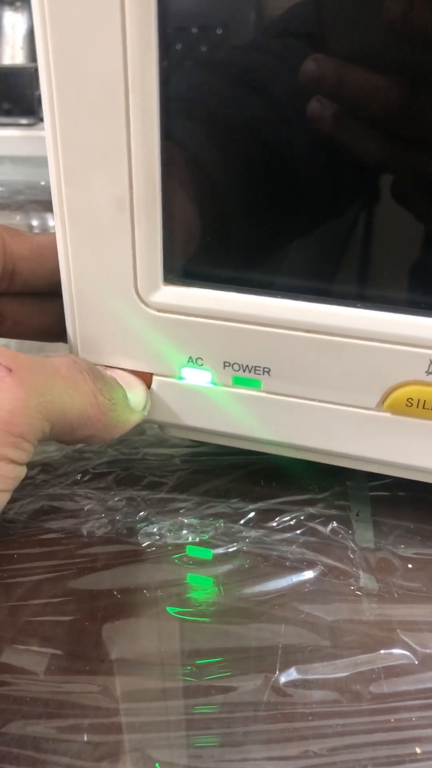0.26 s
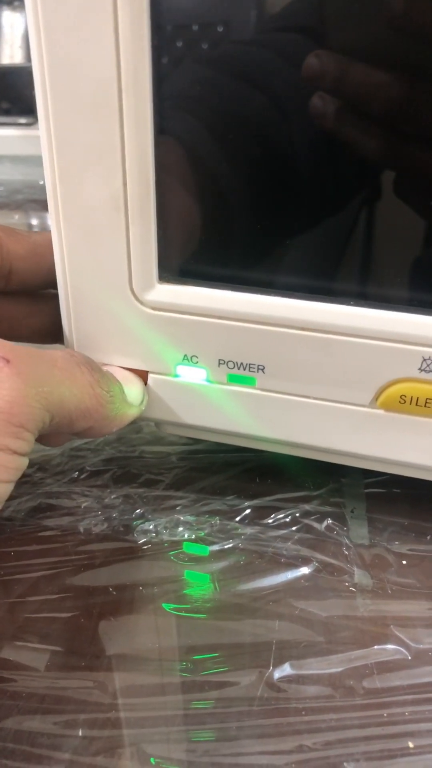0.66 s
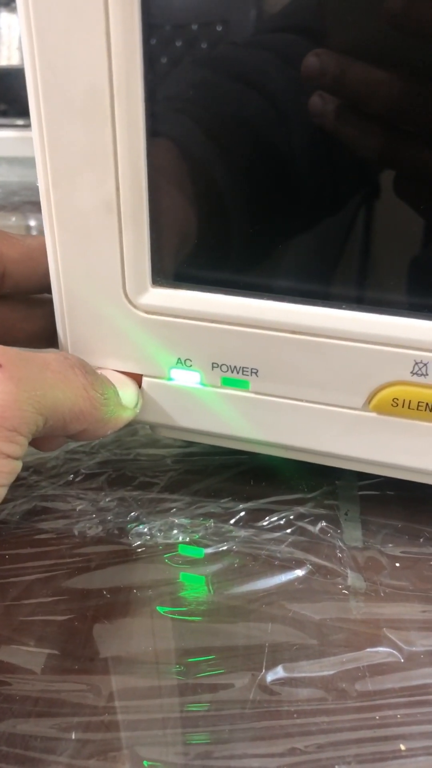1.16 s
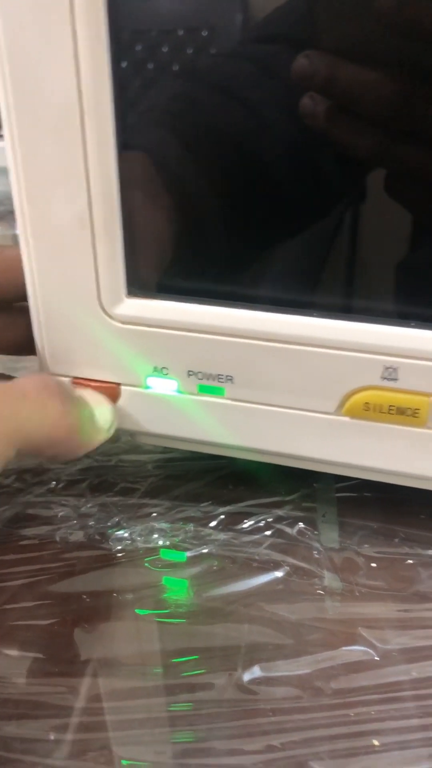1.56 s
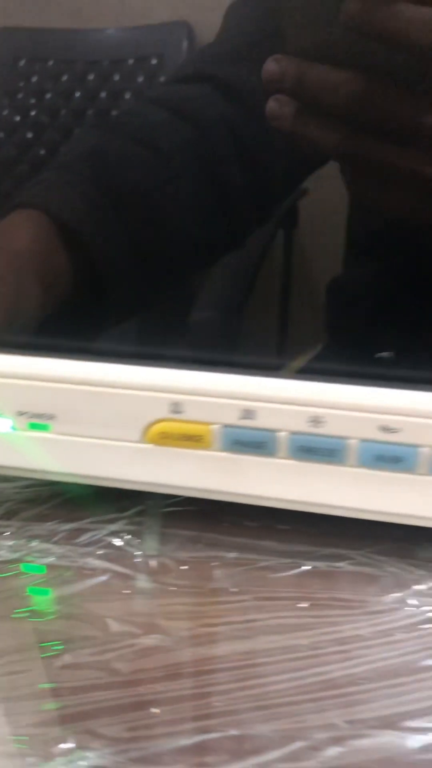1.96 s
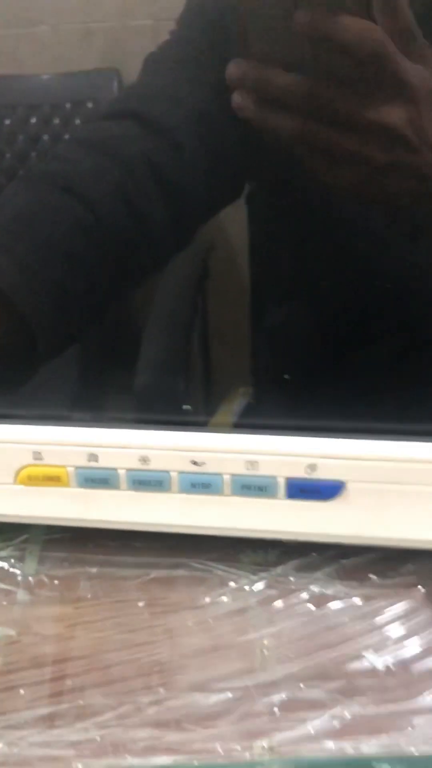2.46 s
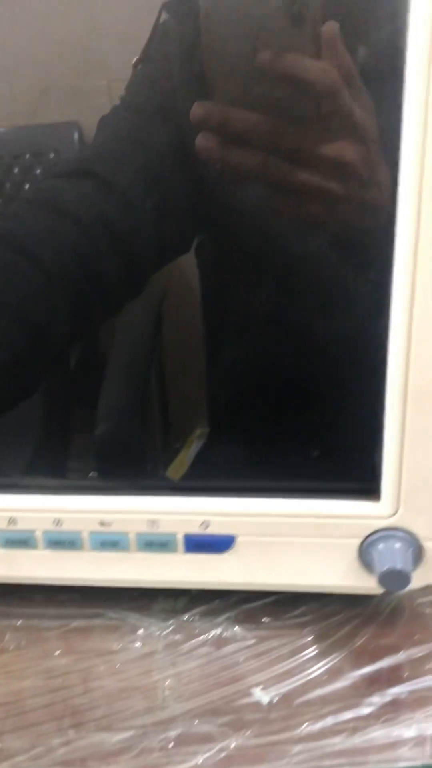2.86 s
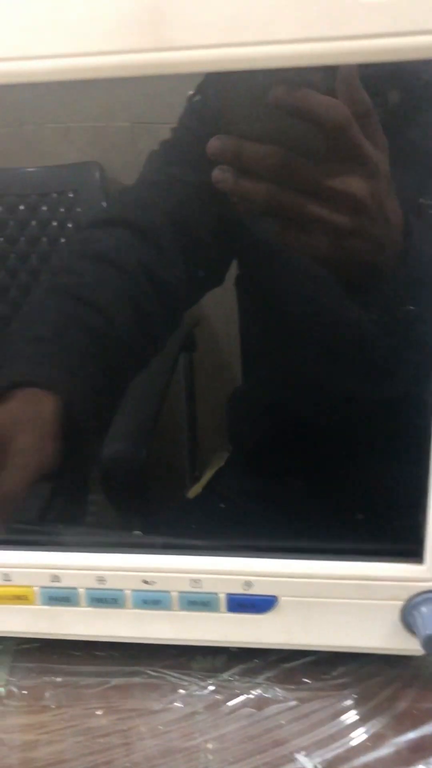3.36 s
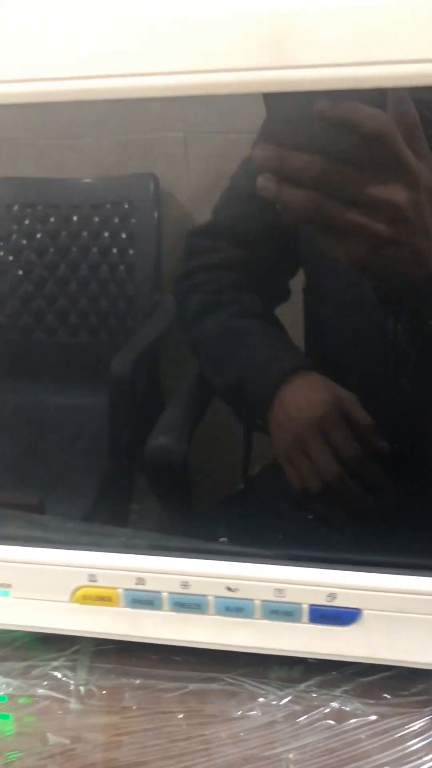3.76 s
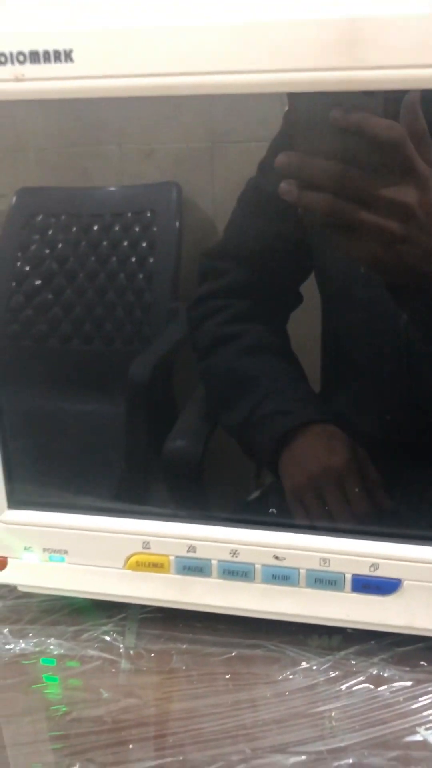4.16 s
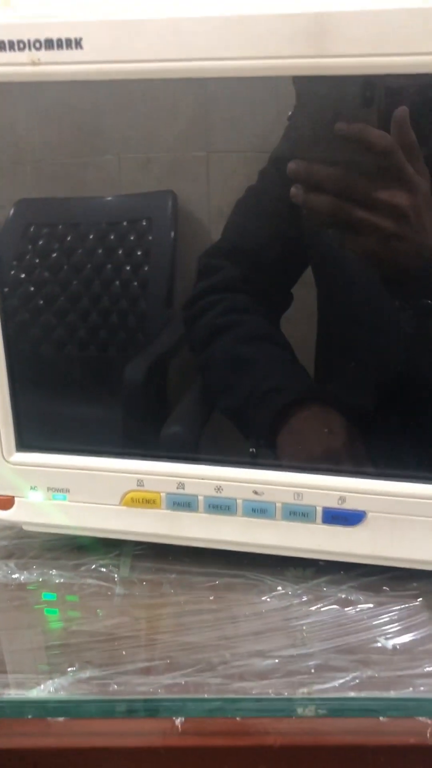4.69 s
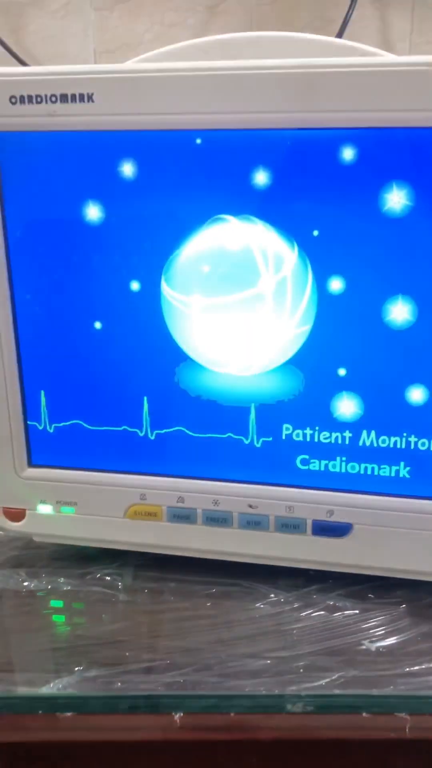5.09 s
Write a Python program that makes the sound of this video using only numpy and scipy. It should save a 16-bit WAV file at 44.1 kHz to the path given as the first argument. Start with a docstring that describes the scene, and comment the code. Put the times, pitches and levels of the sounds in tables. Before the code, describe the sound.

Faint room rumble and mains hum run throughout in a small workshop. At about 0.2 to 0.5 seconds a thumb presses a monitor's power button, making a few short, dry plastic clicks. A sharper cluster with a tiny spring ping comes at 1.6, followed by faint sleeve rustle. The hollow case is softly bumped around 2.1, then scrapes briefly on the table with light taps near 2.5. A relay snaps crisply at 2.7. At 3.7 a sharp knock sets the metal chassis clanking, and the table shudders twice. The sleeve swishes with thin, very high squeaks until about 4.5. More soft bumps land around 4.6. From 4.8 the electronics give a faint hiss and high whine over a low, dull rush. The relay snaps again at about 5.15, and the hiss and whine die away.

```python
"""Over faint room rumble and mains hum, a thumb clicks the power button of a monitor on a workshop table;
each contact excites the modes of the plastic housing. A sleeve rustles by friction, the case is bumped
and slides, and a relay snaps. A later sharp knock sets the metal chassis clanking; the table shudders and
the sleeve swishes and squeaks as the arm draws back. After more soft bumps the electronics hiss and
whine over a low, dull rush, dying away once the relay has snapped a second time."""
import sys
import numpy as np
from scipy import signal
from scipy.fft import rfft, irfft, next_fast_len
from scipy.io import wavfile

SR = 44100
rng = np.random.default_rng(int(sys.argv[2]) if len(sys.argv) > 2 else 0)


def wrap_up_sound(samples):
    """Save the sound to the file named by the first command line argument, as 16-bit audio."""
    columns = np.atleast_2d(samples).T
    # keep every value between -1 and 1, then stretch to whole-number steps
    tamed = np.clip(columns, -1, 1)
    steps = np.round(tamed * 32767).astype(np.int16)
    wavfile.write(sys.argv[1], SR, steps)


N = 235097
TIME = np.arange(N) / SR
AGE = TIME[:SR // 2]   # time since a blow


def from_db(db):
    """Amplitude ratio: a factor of ten per 20 dB."""
    return 10 ** (np.asarray(db) / 20)


def at_hz(points, hz):
    """Interpolation on a logarithmic frequency axis."""
    f, value = np.transpose(points)
    return np.interp(np.log(np.maximum(hz, 1)), np.log(f), value)


def add(track, s, sound):
    """Superposition: a sound joins the track at time s."""
    start = round(s * SR)
    track[start:start + len(sound)] += sound[:N - start]


def blow(x, db):
    """Equivalent level: the energy of a blow, spread over 10 ms, is scaled to db."""
    return from_db(db) * x / np.sqrt(np.sum(x ** 2) / (SR / 100) + 1e-20)


def noise(spectrum, size, tilt=0):
    """Spectral shaping: noise of rms 1, tilted above 1 kHz by tilt dB per octave."""
    hz = np.maximum(np.fft.rfftfreq(size, 1 / SR), 1)
    bass_rolloff = 1 / np.sqrt(1 + (spectrum[0][0] / 2 / hz) ** 6)
    octaves = np.log2(np.maximum(hz / 1000, 1))
    colour = from_db(at_hz(spectrum, hz) + tilt * octaves)
    x = irfft(rfft(rng.standard_normal(size)) * bass_rolloff * colour, size)
    return x / np.std(x)


def flutter(rate):
    """Random modulation: rate values a second, joined linearly, with a spread near 1."""
    knots = rng.standard_normal(N // 16)
    return np.interp(TIME * rate, np.arange(len(knots)), knots)


def fade(t60):
    """Exponential damping: 60 dB in t60 seconds."""
    return np.exp(-np.log(1000) * AGE / t60)


def swell(seconds):
    """Finite rise time: the amplitude builds smoothly to 1."""
    return 1 - np.exp(-(AGE / seconds) ** 2)


def held(start_s, length_s, attack_s, release_s):
    """Sustained excitation: a smooth onset, then exponential decay after length_s."""
    age = np.maximum(TIME - start_s, 0)
    return (1 - np.exp(-(age / attack_s) ** 2)) * np.exp(-np.maximum(age - length_s, 0) / release_s)


def surge(peak_s, rise_s, fall_s):
    """Exponential growth and decay: a movement speeds up to one peak and slows at once."""
    return np.exp(-np.maximum((peak_s - TIME) / rise_s, (TIME - peak_s) / fall_s))


def ring(modes, cycles):
    """Modal superposition: damped sines of random strength build over some cycles, the lows last."""
    out = 0
    for k, (hz, db, t60) in enumerate(modes):
        strength = (-1) ** k * from_db(db + rng.standard_normal())
        out = out + strength * swell(cycles / hz) * fade(t60) * np.sin(2 * np.pi * hz * AGE)
    return out


def high_pass(x, hz):
    """Radiation efficiency: small bodies radiate little bass."""
    return signal.sosfilt(signal.butter(3, hz, "high", fs=SR, output="sos"), x)


# reverberation time: f/Hz, T60/s
ROOM_DECAY = [(100, 0.23), (300, 0.25), (800, 0.32), (3000, 0.41), (8000, 0.31), (16000, 0.24)]
# band gain of the reverberation: f/Hz, level/dB
ROOM_GAIN = [(100, 26.5), (200, 16), (300, 5.5), (550, 0.5), (1000, -1.5), (3000, 0.5), (8000, -6),
             (16000, -1)]
def room(x, wet_db, build_s):
    """Reverberation: diffuse reflections build up after the direct sound and die band by band."""
    hz = np.fft.rfftfreq(len(AGE), 1 / SR)
    white = rfft(rng.standard_normal(len(AGE)))
    edges = np.geomspace(50, 18000, 13)
    tail = 0
    for low, high in zip(edges, edges[1:]):
        centre = np.sqrt(low * high)
        decay = fade(at_hz(ROOM_DECAY, centre)) * swell(build_s)
        band = irfft(white * (hz >= low) * (hz < high), len(AGE))
        tail = tail + band * decay / np.linalg.norm(decay) * from_db(at_hz(ROOM_GAIN, centre))
    return x + from_db(wet_db) * signal.fftconvolve(x, tail)[:N]


# room rumble: f/Hz, relative spectrum level/dB
RUMBLE_SPECTRUM = [(15, -31), (25, -15), (48, -11), (84, -7), (114, -9.5), (212, -6), (236, -11.5),
                   (344, -9.5), (463, -13.5), (503, -12), (734, -19.5), (2350, -27.5), (9840, -32.5),
                   (16000, -39)]
# mains harmonics: f/Hz, rms level/dB
MAINS_TONES = [(60, -76), (120, -76)]
def background():
    """Stationary sound: the continuous spectrum of room rumble under the line spectrum of mains hum."""
    hum = sum(from_db(db) * np.sqrt(2) * np.sin(2 * np.pi * (hz * TIME + rng.random()))
              for hz, db in MAINS_TONES)
    return from_db(-67.5) * noise(RUMBLE_SPECTRUM, N) + hum


# circuit hiss: f/Hz, relative spectrum level/dB
HISS_SPECTRUM = [(600, -20), (1400, -8), (3800, -4), (4750, -1), (6000, -5.5), (8200, -10.5), (12500, -8),
                 (16000, -13)]
# power-supply whine: f/Hz, level/dB re the hiss
WHINE_TONES = [(4740, -12), (8050, -13), (9900, -15)]
def electronics():
    """Circuit noise and frequency-modulated whine: both rise at switch-on and fade after the last snap."""
    on_s, wander_hz = 4.78, 230
    whine = 0
    for hz, db in WHINE_TONES:
        pitch = hz + wander_hz * flutter(700)
        whine += from_db(db) * np.sqrt(2) * np.sin(2 * np.pi * np.cumsum(pitch) / SR)
    last_snap_s = RELAY_SNAPS[-1][0]
    waking = held(on_s, last_snap_s - on_s, attack_s=0.048, release_s=0.18)
    return from_db(-65) * waking * (noise(HISS_SPECTRUM, N) + whine)


# arm strokes; the last row is a low, dull rush while the electronics run:
# t/s, duration/s, level/dB, tilt/(dB/octave)
STROKES_AND_RUSH = [(-0.04, 0.075, -64, 1), (1.572, 1.71, -65.5, 0.47), (3.185, 0.5, -58, 0.1),
                    (3.66, 0.15, -49.5, 0), (3.835, 0.13, -54.5, 1), (4.002, 0.16, -55, 2.5),
                    (4.151, 0.53, -57.5, -2.5), (4.537, 0.058, -59, 2), (4.733, 0.48, -62, -4)]
# rubbing cloth, also tilted down for the rush: f/Hz, relative spectrum level/dB
RUSTLE_SPECTRUM = [(120, -5), (250, 1), (500, -1), (1000, -3), (2000, -10), (4000, -11), (7000, -18),
                   (11000, -21.5), (14000, -28), (16000, -39)]
# swishes where the arm is quickest: peak t/s, level/dB, decay time/s
ARM_SWISHES = [(3.38, -63, 0.071), (3.85, -57.5, 0.41), (4.11, -60.5, 0.32)]
# hissing weave: f/Hz, relative spectrum level/dB
WEAVE_SPECTRUM = [(2500, 0), (6000, -3), (10000, -4.5), (14000, -5), (16000, -8.5)]
# thin squeaks of the weave: t/s, duration/s, f/Hz
WEAVE_SQUEAKS = [(4.135, 0.07, 13500), (4.2, 0.11, 13800), (4.275, 0.079, 11800), (4.335, 0.05, 13850),
                 (4.39, 0.1, 11950), (4.435, 0.07, 13800)]
def sleeve_and_rush():
    """Friction noise: cloth rubs unevenly, hissing and squeaking at speed. A low, dull rush follows."""
    out = np.zeros(N)
    for start, length, db, tilt in STROKES_AND_RUSH:
        envelope = held(start, length, attack_s=0.05 + 0.1 * length, release_s=0.094)
        rustle = noise(RUSTLE_SPECTRUM, next_fast_len(N), tilt)[:N]
        out += envelope * from_db(db + flutter(60)) * rustle
    swishes = [from_db(db) * surge(s, rise_s=0.085, fall_s=fall) for s, db, fall in ARM_SWISHES]
    out += np.linalg.norm(swishes, axis=0) * noise(WEAVE_SPECTRUM, N)   # powers add
    for s, length, hz in WEAVE_SQUEAKS:
        size = int(length * SR)
        pitch = hz * (1 + 0.0073 * flutter(44) + 0.012 * flutter(700))[:size]   # drift and jitter
        add(out, s, from_db(-68) * np.hanning(size) * np.sin(2 * np.pi * np.cumsum(pitch) / SR))
    return out


# scraping feet: f/Hz, relative spectrum level/dB
SCRAPE_SPECTRUM = [(200, -11), (480, 7.5), (900, -2.5), (2000, -1.5), (3600, -2.5), (5500, -9.5),
                   (8000, -16), (16000, -21)]
def slide():
    """Stick-slip friction: the feet scrape in small slips as the case gathers speed and is braked."""
    speed = surge(peak_s=2.561, rise_s=0.072, fall_s=0.093)
    return noise(SCRAPE_SPECTRUM, N) * speed * from_db(-47 + 2 * flutter(380))


# shudders of the table: t/s, level/dB
TABLE_SHUDDERS = [(3.72, -49.5), (3.939, -53)]
# table vibration: f/Hz, relative spectrum level/dB
TABLE_SPECTRUM = [(55, -13), (90, -7.5), (120, 5), (165, -12), (250, -9), (400, -14), (800, -31),
                  (3000, -57)]
def shudder():
    """Forced vibration: the table shakes each time the case settles on it."""
    shaking = sum(from_db(db) * held(s, length_s=0.094, attack_s=0.017, release_s=0.062)
                  for s, db in TABLE_SHUDDERS)
    return shaking * noise(TABLE_SPECTRUM, N)


# soft bumps on the case: t/s, thump level/dB, scuff level/dB
CASE_BUMPS = [(2.0240, -41.5, -44), (2.084, -34.5, -47), (2.14, -49.5, -62), (4.5950, -48, -64),
              (4.6040, -55.5, -53), (4.641, -53, -62), (4.71, -80, -50.5)]
# hollow resonances: f/Hz, relative level/dB, T60/s
HOLLOW_MODES = [(216, -15.5, 0.039), (281.4, -29.5, 0.19), (432, -2.5, 0.063), (432, -29, 0.0083)]
# scuffing contact: f/Hz, relative spectrum level/dB
SCUFF_SPECTRUM = [(260, 6.5), (450, 10), (700, 2.5), (1000, 3.5), (1600, -7.5), (2700, -10), (5000, -26),
                  (16000, -32)]
def bumps():
    """Soft impact: a slow contact excites only the low hollow resonances, with a scuff on top."""
    out = np.zeros(N)
    for s, thump_db, scuff_db in CASE_BUMPS:
        add(out, s, blow(ring(HOLLOW_MODES, cycles=2.13), thump_db))
        scuff = noise(SCUFF_SPECTRUM, len(AGE)) * fade(0.27) * swell(0.00036)
        add(out, s, blow(scuff, scuff_db))
    return high_pass(room(out, wet_db=-9, build_s=0.015), 208)


# relay closures: t/s, snap level/dB, ring level/dB, snap tilt/(dB/octave)
RELAY_SNAPS = [(2.7296, -31.5, -37.5, -0.4), (5.1503, -32, -33.5, -0.2)]
# armature impact: f/Hz, relative spectrum level/dB
SNAP_SPECTRUM = [(500, -3), (1200, 5.5), (1500, -12), (1900, 4), (2700, -8), (3800, -0.5), (5400, 2.5),
                 (6300, 0.5), (7400, -9.5), (8600, 2), (10800, 6), (12300, 1.5), (13600, -3.5),
                 (16000, -13.5)]
# relay frame and board: f/Hz, relative level/dB, T60/s
RELAY_MODES = [(275, -14, .2), (715, -11, .08), (856, 0, .115), (1122, -9, .14), (1950, -16, .11),
               (3350, -17, .16), (4682, -12, .12), (5425, -9, .11), (5462, -9, .14), (5680, -12, .14),
               (5833, -9, .11), (9770, -14, .14), (10450, -12, .13), (10753, -12, .14), (11264, -10, .14),
               (11950, -12, .14), (12480, -13, .16), (13275, -16, .16)]
def relay():
    """Impact and rebound: the armature slams shut and chatters; the loose frame and board ring on."""
    rattle_db, rattle_hz = 7, 171
    snaps, rings = np.zeros(N), np.zeros(N)
    for s, snap_db, ring_db, tilt in RELAY_SNAPS:
        impact = (fade(0.044) + 0.18 * fade(0.1)) * swell(0.0015)   # hard blow, then dying rebounds
        chatter = impact * from_db(3.5 * flutter(1362)[:len(AGE)])
        rattle = from_db(rattle_db * flutter(rattle_hz)[:len(AGE)])
        snap = high_pass(noise(SNAP_SPECTRUM, len(AGE), tilt) * chatter, 240)
        add(snaps, s, blow(snap, snap_db))
        add(rings, s, blow(ring(RELAY_MODES, cycles=6.3) * rattle, ring_db))
    return room(snaps, wet_db=-4, build_s=0.014) + room(rings, wet_db=-10, build_s=0.013)


# clicks and taps: t/s, knock level/dB, knock centre f/Hz, tick level/dB, tick tilt/(dB/octave)
CONTACTS = [(0.2185, -52.5, 396, -53, -3), (0.2602, -50.5, 940, -71, 4), (0.2754, -37, 505, -51, -2),
            (0.4698, -43.5, 920, -53.5, 0.5), (0.7332, -73, 900, -64.5, -1.5), (1.4240, -56, 870, -72, 1),
            (1.532, -66, 800, -66, 1), (1.5632, -35, 940, -38.5, -0.5), (1.582, -52, 603, -53, 2.5),
            (1.5894, -44, 382, -48.5, 3.5), (1.6919, -57.5, 1200, -53.5, -0.5),
            (2.4166, -71, 1300, -58, -3), (2.443, -72, 480, -59, -8), (2.4810, -61, 1300, -56.5, -2),
            (2.502, -71, 500, -54, -2), (2.547, -41.5, 694, -58, 2), (3.6925, -49, 1710, -50, -1.5),
            (3.6980, -48, 1700, -47, -4), (3.7060, -40, 740, -38.5, -3), (3.7290, -44.5, 516, -47, -1),
            (3.926, -51, 333, -52.5, -0.5)]
# plastic housing: f/Hz, relative level/dB, T60/s
HOUSING_MODES = [(218.8, -21.5, 0.16), (271.6, -15.5, 0.16), (402, -9, 0.051), (470, -6, 0.035),
                 (626, -8.5, 0.049), (796, -8, 0.03), (1173, 5.5, 0.0045), (1486, -12, 0.0056),
                 (1580, -15, 0.054), (2210, -13.5, 0.0047), (3670, -28, .014)]
# dry tick: f/Hz, relative spectrum level/dB
TICK_SPECTRUM = [(700, 5.5), (1400, 4.5), (2000, 0), (2700, -4.5), (3400, -3), (4400, -5), (6200, -6),
                 (8500, -12), (13000, -17), (16000, -32)]
# button spring, loaded and released: t/s, f/Hz, level/dB, T60/s
SPRING_PINGS = [(0.22, 3310, -58, 0.01), (1.5870, 2230, -52, 0.087)]
# chassis clank at a later sharp knock: t/s, level/dB
CHASSIS_CLANKS = [(3.7060, -37.5)]
# metal chassis: f/Hz, relative level/dB, T60/s
CHASSIS_MODES = [(626, -1, 0.11), (918, -7, 0.19), (1830, -8, 0.11), (3085, -1.5, 0.028),
                 (4630, -4.5, 0.032), (4995, -2, 0.036), (5100, 2, 0.042), (7300, -13, 0.067),
                 (9458, -14, 0.052)]
def button():
    """Impulse excitation: each contact ticks and knocks the housing; where it lands weights the modes."""
    echo_s, echo_db = 0.003547, -8   # reflection from the table top
    out = np.zeros(N)
    for s, knock_db, centre_hz, tick_db, tilt in CONTACTS:
        contact = signal.butter(1, [centre_hz / 1.8, centre_hz * 1.59], "band", fs=SR, output="sos")
        knock = signal.sosfilt(contact, ring(HOUSING_MODES, cycles=0.49))
        echo = from_db(echo_db) * np.interp(AGE - echo_s, AGE, knock, left=0)
        tick = noise(TICK_SPECTRUM, len(AGE), tilt) * fade(0.03)
        add(out, s, blow(knock + echo, knock_db) + blow(tick, tick_db))
    for s, hz, db, t60 in SPRING_PINGS:
        add(out, s, blow(ring([(hz, 0, t60)], cycles=3.4), db))
    for s, db in CHASSIS_CLANKS:
        add(out, s, blow(ring(CHASSIS_MODES, cycles=0.086), db))
    return high_pass(room(out, wet_db=-8, build_s=0.0025), 168)


def scene():
    """Linear superposition: the pressures of all sources add in one channel."""
    impacts = button() + bumps() + relay()
    return (impacts + sleeve_and_rush() + slide() + shudder() + background() + electronics())[None]


def record(dry):
    """Band limiting: the microphone thins the deep bass, and the top treble is cut."""
    thin = signal.sosfilt(signal.butter(2, 35, "high", fs=SR, output="sos"), dry)
    return signal.sosfilt(signal.ellip(10, .1, 80, 15750, fs=SR, output="sos"), thin)


dry = scene()
out = record(dry)
wrap_up_sound(out)
```